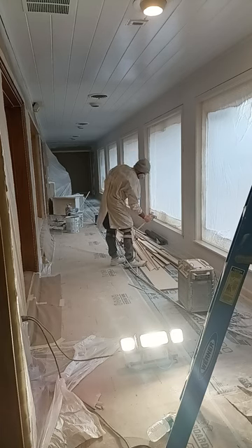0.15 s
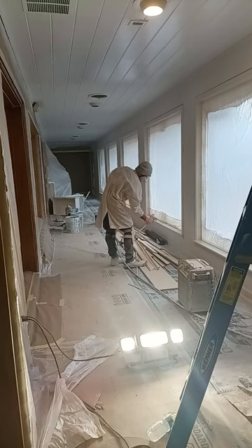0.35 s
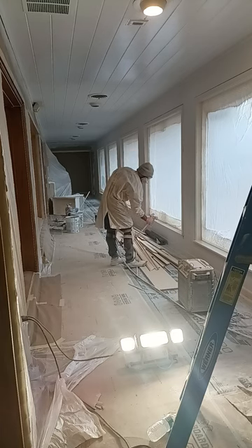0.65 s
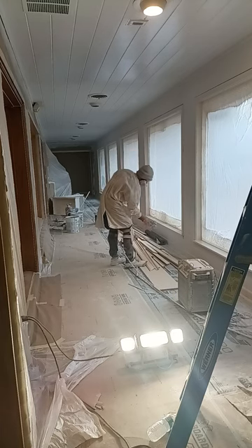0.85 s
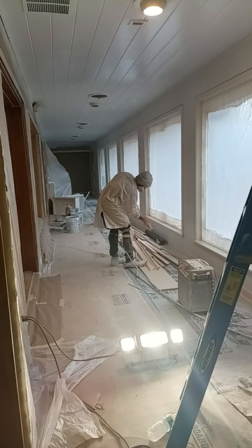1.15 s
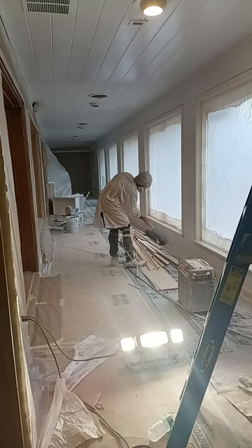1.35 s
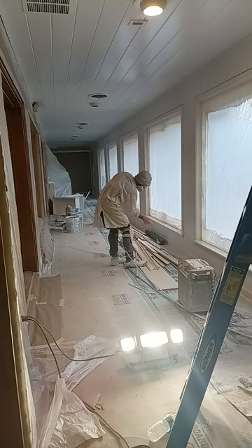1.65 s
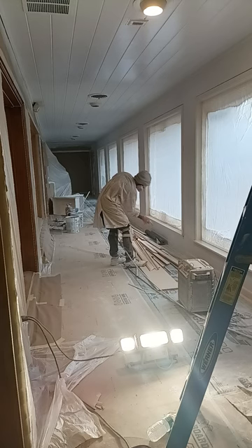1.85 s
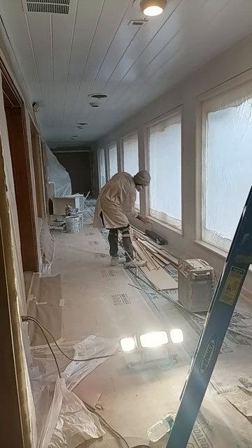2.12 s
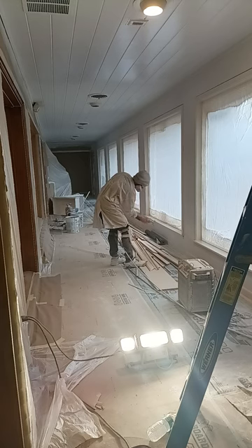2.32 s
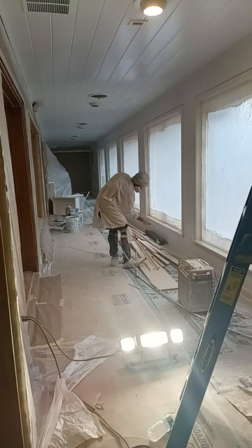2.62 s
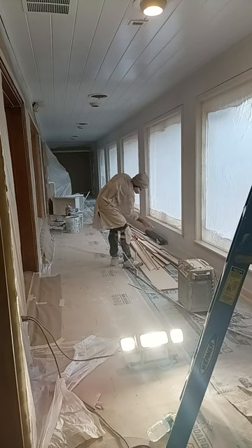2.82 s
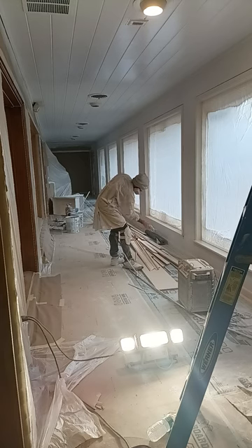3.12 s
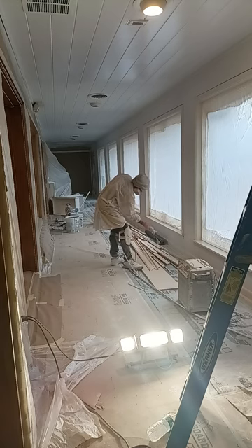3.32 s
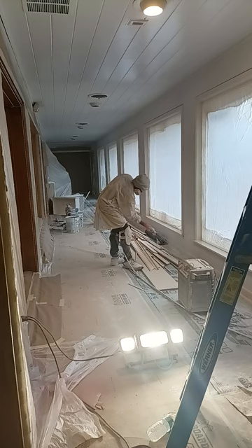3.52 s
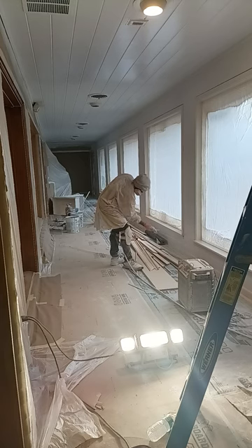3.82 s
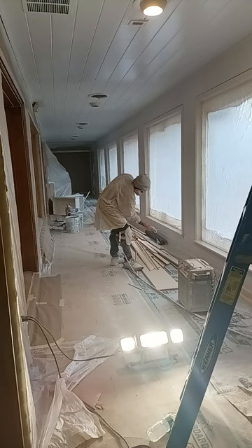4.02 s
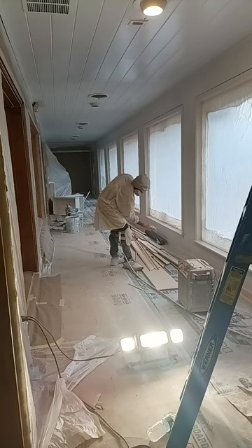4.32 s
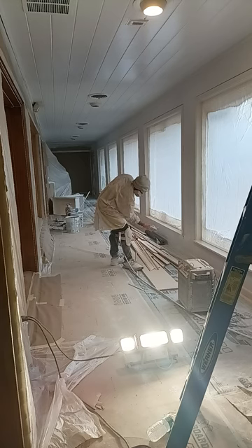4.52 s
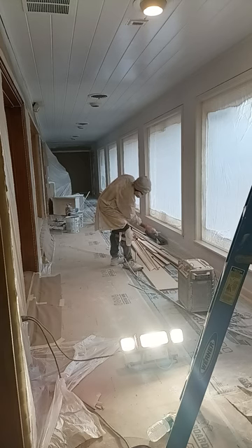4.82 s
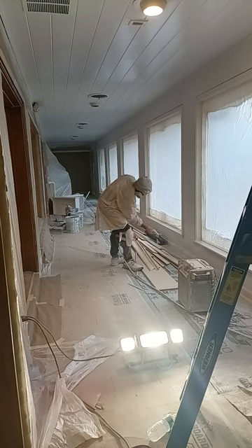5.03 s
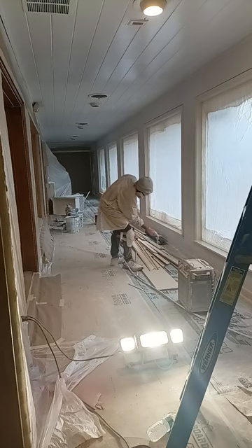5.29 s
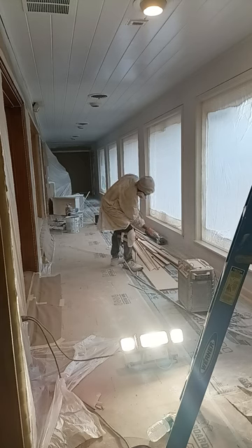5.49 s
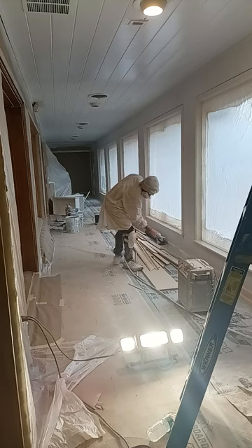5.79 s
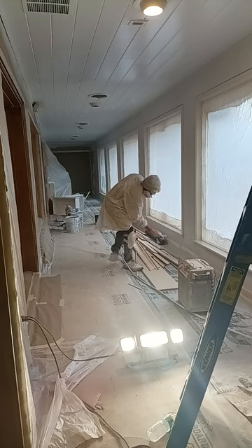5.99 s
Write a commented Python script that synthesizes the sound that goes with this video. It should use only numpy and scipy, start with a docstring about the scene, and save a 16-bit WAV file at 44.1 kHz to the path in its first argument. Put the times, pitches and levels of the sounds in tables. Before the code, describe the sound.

Indoors in a long bare room, an airless spray gun is already hissing. Bright, dense jets open and cut off abruptly, pass after pass. About once a second an electric pump motor growls up, a metallic valve slaps, and the motor coasts down. Little clicks and spits fall in the gaps over low rumble and hum. Wide stereo pickup, louder on the left.

```python
"""An airless paint sprayer in a long bare room. The gun is already hissing as a first valve slap rings out near the start.
Pass follows pass over the boards: jet, mist and splash are coloured noises, opened and shut by the trigger. About once
a second the pump motor spins up in layers of noise and short casing tones, a valve slaps, and the motor coasts down.
Small knocks and spits fall between over a low rumble and hum; a faint thin whine comes near the end.
Two microphone ports facing different ways hear it, the left one louder in most bands."""
import sys
import numpy as np
from scipy import signal
from scipy.fft import rfft, irfft, next_fast_len
from scipy.io import wavfile
from scipy.ndimage import uniform_filter1d, map_coordinates

SR = 44100
rng = np.random.default_rng(int(sys.argv[2]) if len(sys.argv) > 2 else 0)


def pcm_store(signal):
    """Save signal as 16-bit PCM."""
    levels = np.round(np.clip(np.atleast_2d(signal), -1, 1) * 32767)
    wavfile.write(sys.argv[1], SR, levels.astype(np.int16).T)


N = 271270  # samples

# pump strokes: slap_s, slap_db (relative), motor_db, extra_treble_db, extra_bass_db,
# slow_start_db (extra level until 0.28 s before the slap), run_down (length, times the usual)
STROKES = [(0.0204, -15.5, 0.3, 4.5, 1, 0, 0.98), (0.7494, -26, -0.3, 2, 1, -11, 0.91),
           (2.387, -6.5, -0.1, 3.5, -1, -1, 1.044), (3.481, -13, 0.33, 2.6, -0.7, 4.5, 0.96),
           (4.5201, -13.5, -0.24, 4, 5.5, -6.5, 0.99), (5.5069, -11, -0.24, 4.1, -3.5, 1.5, 1.002)]
# colour of the jet, and of the pump's top hiss: pitch_hz, level_db (relative)
JET_COLOUR = [(4000, -45), (4800, -19), (5150, -14), (5500, -13.5), (6050, -5), (6450, -4.5), (6800, -1),
              (7150, 1), (7600, -4), (8100, -10.5), (9500, -23), (11000, -39)]
# colour of the mist, and of the pump's finest hiss: pitch_hz, level_db (relative)
MIST_COLOUR = [(7000, -1), (9000, -0.9), (11000, -8), (13000, -10.5), (16000, -12.5)]


def gun():
    """Paint tears into a jet at the tip, a fine mist above it and a duller splash where it lands."""
    # trigger pulls: opens_s, shuts_s, build_up_s, jet_db, mist_db (against the jet),
    # first_splash_db and last_splash_db (against the jet, as it opens and as it shuts)
    passes = [(-.1, 0.675, .03, -42, -12, -1, -17), (1.17, 1.306, .08, -64, -0.5, 3, -2),
              (1.355, 1.456, .005, -50.5, -26, -8, -2), (1.451, 2.31, .06, -41.5, -10.5, -7, -17),
              (2.605, 3.318, 0.037, -41, -11, 1, -15), (3.617, 4.452, .025, -41.5, -10.5, -20.5, -9.5),
              (4.642, 5.524, 0.023, -42, -10, -19, -9), (5.746, 6.3, 0.049, -41, -10.5, -3.5, -10)]
    # colour of the splash: pitch_hz, level_db (relative)
    splash_colour = [(250, -35.5), (500, -25), (1000, -22), (2000, -12), (3000, -8), (4000, -3.5),
                     (5000, 0.5), (6000, -3)]
    fade_db_per_s = 165  # the hiss dies away after the trigger shuts
    t = np.arange(N) / SR
    jet_gain, mist_gain, splash_gain = np.zeros((3, N))
    for opens, shuts, build, jet_db, mist_db, first_db, last_db in passes:
        opening = np.minimum(np.maximum(t - opens, 0) / build, 1)
        since_shut = np.maximum(np.maximum(t, opens) - shuts, 0)
        flow = opening * amp(jet_db - fade_db_per_s * since_shut)
        jet_gain += flow
        mist_gain += flow * amp(mist_db)
        splash_gain += flow * amp(np.interp(t, [opens, shuts], [first_db, last_db]))
    jet = jet_gain * rush(JET_COLOUR, patchy_db=0.5, grain_db=0.2, grain_rate=450)
    mist = mist_gain * rush(MIST_COLOUR, patchy_db=1.0, grain_db=0.3, grain_rate=490)
    splash = splash_gain * rush(splash_colour, patchy_db=1.8, grain_db=1.0, grain_rate=270)
    splash = amp(2.1 * wobble(6)) * splash
    return amp(0.91 * wobble(25)) * (jet + mist + splash)


def pump():
    """Six colours of noise follow the motor speed, with the casing's tones under the rumble's level."""
    # colours of the casing rumble, gear rattle, brush hiss and frame thrum: pitch_hz, level_db (relative)
    rumble_colour = [(350, -43), (470, -12.5), (560, -2.5), (690, -2.5), (780, -4), (860, -2.5),
                     (1000, -7.5), (1150, -10), (1400, -13)]
    rattle_colour = [(900, -17), (1250, -6.5), (1600, 1.5), (1900, -2.5), (2150, -8.5), (2400, -6.5),
                     (3000, -11), (3500, -16.5), (4000, -21.5), (4600, -45)]
    brush_colour = [(3200, -11.5), (3750, 2), (4100, -2), (4800, 6.5), (5300, 6), (5800, -1), (6500, 3),
                    (7100, -5), (8000, -79), (10000, -49.5)]
    thrum_colour = [(90, -32.5), (170, -14.5), (220, -5), (290, 1.4), (390, 2.5), (450, 1), (560, -34.5)]
    rumble, rattle, brush, thrum, top, fine = strokes()[:6]
    noise = rush(rumble_colour, patchy_db=1.5, grain_db=-0.8, grain_rate=150)
    out = rumble * (noise + casing_tones())
    out += rattle * rush(rattle_colour, patchy_db=1.5, grain_db=1.16, grain_rate=200)
    out += brush * rush(brush_colour, patchy_db=1.5, grain_db=0.5, grain_rate=320)
    out += thrum * rush(thrum_colour, patchy_db=3.5, grain_db=1.2, grain_rate=72)
    out += top * rush(JET_COLOUR, patchy_db=3.5, grain_db=1.7, grain_rate=150)
    out += fine * rush(MIST_COLOUR, patchy_db=1.3, grain_db=-5.2, grain_rate=400)
    return amp(0.37 * wobble(22.22)) * out


def casing_tones():
    """A gear tone crosses each casing mode: a sine at the mode's pitch swells and fades."""
    # casing modes: pitch_hz, level_db (relative), after_slap_s, length_s (spread of the bell-shaped swell)
    modes = [(292.2, -0.5, -0.087, 0.013), (710, 0.5, -0.059, 0.071), (1447, -2, -0.138, 0.016),
             (1525, 4, -.02, 0.02), (697, -0.5, -0.14, 0.09), (300, 1.5, -0.164, 0.014),
             (1729, -0.5, -0.0021, 0.031), (678, 0, 0.056, 0.011), (850, -1, 0.101, 0.021),
             (548, -2.5, 0.14, 0.016), (390, -10, 0.17, 0.053), (2376, -10, 0.022, 0.068),
             (900, -7.5, 0.16, 0.03), (1355, -15, -0.041, 0.021), (1595, -19.5, 0.31, 0.047),
             (1920, -7, -0.089, 0.035), (2297, -10.5, -0.028, 0.078), (3740, -19, 0.04, .05),
             (4740, -20, 0.089, 0.025), (5200, -24, -0.045, 0.05), (5090, -19, 0.1, 0.051),
             (2970, -12.5, -0.069, 0.05), (6390, -16, -0.03, 0.055), (6660, -16.5, 0.032, 0.041)]
    t = np.arange(-SR // 3, SR // 2) / SR  # seconds after the slap
    tones = np.zeros((2, N + 2 * SR))  # a second to spare at both ends
    for slap, *_ in STROKES:
        first = SR + round(slap * SR) - SR // 3
        for hz, db, after, length in modes:
            size, slide, turn = rng.standard_normal((3, 2, 1))  # chance level, pitch and phase per channel
            swell = amp(db + 2.0 + 0.92 * size) * np.exp(-.5 * ((t - after) / length) ** 2)
            cycles = hz * (1 + 0.00394 * slide) * t + turn
            tones[:, first:first + len(t)] += swell * np.sin(2 * np.pi * cycles)
    return tones[:, SR:SR + N]


def strokes():
    """Gain of each pump layer: one shape of motor run-up and run-down laid out at every slap."""
    # one stroke: after_slap_s, then the levels casing_rumble_db, gear_rattle_db, brush_hiss_db,
    # frame_thrum_db, top_hiss_db, finest_hiss_db, floor_boom_db, low_hum_db (all relative)
    shape = [(-.335, -79.5, -74, -85, -80, -90, -95, -73, -85),
             (-.315, -64, -59.5, -68, -60, -85, -93, -83, -79),
             (-.22, -54, -63, -78, -50, -80, -90, -76, -66),
             (-.17, -46.5, -50, -60.5, -44, -75, -84, -75, -66),
             (-.14, -38.5, -40.5, -62, -39, -63, -76.5, -65, -60),
             (-.088, -33, -31, -57.5, -38, -59.5, -70, -63, -55),
             (-.074, -29, -26, -39.5, -34.5, -43, -71.5, -61.5, -59),
             (-.02, -31, -22.5, -34, -33, -43, -65.5, -54, -47),
             (.005, -27, -20.5, -28, -37, -43.5, -56.5, -54, -41.5),
             (.04, -22, -21.5, -30.5, -29.5, -39, -70, -64, -43),
             (0.101, -24.5, -23.5, -36, -30, -45.5, -63.5, -69, -55),
             (.16, -29.5, -27.5, -41.5, -41.5, -55, -70, -63.5, -51.5),
             (0.271, -32.5, -35, -53, -40, -60, -78, -76.5, -73),
             (.45, -52, -56, -71.5, -60.5, -61, -80, -83, -81),
             (.62, -64, -65.5, -66, -71, -64, -83, -91, -81),
             (1.1, -83.5, -82, -89, -96, -80, -93, -93, -87.5)]
    s, *layers = np.transpose(shape)
    gains = np.zeros((len(layers), N))
    for slap, _, motor_db, treble_db, bass_db, start_db, run_down in STROKES:
        t = np.arange(N) / SR - slap
        t = np.where(t > 0, t / run_down, t)
        # the slow start's extra level stops at once 0.28 s before the slap
        level_db = motor_db + np.where(t < -0.28, start_db, 0)
        extra_db = [0, 0, treble_db, 0, treble_db, treble_db, bass_db, bass_db]
        for gain, layer_db, extra in zip(gains, layers, extra_db):
            gain += amp(np.interp(t, s, layer_db, left=-120, right=-120) + level_db + extra)
    return gains


def valve():
    """A valve slaps at the top of each stroke: the modes of its seat ring high and short."""
    # modes of the valve seat: pitch_hz
    seat_hz = (4500, 4790, 5095)
    out, t = np.zeros(N + SR), np.arange(SR // 8) / SR
    attack = 1 - np.exp(-t / 0.00059)
    for slap, db, *_ in STROKES:
        ring = 0
        for hz in seat_hz:
            ring = ring + amp(rng.normal(0, 1.6) - 60 * t / 0.024) * np.sin(2 * np.pi * hz * t)
        out[round(slap * SR):][:len(t)] += amp(db - 9.0) * attack * ring
    return out[:N]


def knocks():
    """Small knocks of trigger, hose and relay: a dying sine roughened by slow noise."""
    # knocks: start_s, level_db (relative), pitch_hz, t60_s, roughness (0-1)
    hits = [(1.357, -39.5, 2080, 0.048, 0.66), (1.44, -33, 2175, 0.056, 0.5),
            (1.457, -38, 2440, 0.063, 0.53), (1.468, -41.5, 2850, 0.053, 0.64),
            (2.069, -48, 1490, 0.18, 0.5), (2.786, -21.5, 1895, 0.037, 0.47), (2.947, -32, 2330, 0.045, .4),
            (2.99, -33, 2280, 0.032, .3), (3.171, -44, 1560, 0.1, 0.5), (3.184, -41, 1950, 0.1, 0.44),
            (5.188, -55, 1600, .07, .4), (5.202, -39, 1504, 0.1, 0.04), (5.785, -29, 1090, 0.11, .1),
            (5.875, -32.5, 867, 0.09, 0.16), (6.045, -47, 877, 0.13, 0.24)]
    out, t = np.zeros(N + SR), np.arange(SR // 8) / SR
    attack = 1 - np.exp(-t / 0.0042)
    for s, db, hz, t60, share in hits:
        grit = unit(np.convolve(rng.standard_normal(len(t)), np.hanning(60), "same"))
        rough = 1 - share + share * grit
        ring = attack * rough * np.sin(2 * np.pi * hz * t)
        out[round(s * SR):][:len(t)] += amp(db - 60 * t / t60) * ring
    return out[:N]


def spits():
    """The tip spits as the trigger is eased: each spit is a short dying puff of coloured noise."""
    # spits: start_s, level_db (relative)
    times = [(1.238, -45), (1.2634, -49), (1.3638, -33), (1.3868, -40.5), (1.4224, -33), (1.44, -31)]
    # colour of a puff: pitch_hz, level_db (relative)
    puff_colour = [(1, -60), (2500, -37), (4500, 6), (7500, 3.5), (9500, -21), (16000, -36)]
    out, t = np.zeros(N + SR), np.arange(SR // 8) / SR
    for s, db in times:
        out[round(s * SR):][:len(t)] += amp(db - 2.0 - 60 * t / 0.022) * rng.standard_normal(len(t))
    return filtered(out[:N], lambda hz: amp(along(puff_colour, hz)[0]))


def air():
    """The room's low rumble, a noise that rises and falls and is lifted by each pump stroke's floor boom."""
    # level of the rumble between strokes: time_s, level_db (relative)
    room_levels = [(0, -68), (1.4, -65), (1.5, -59.5), (1.8, -65.5), (2.9, -67), (3.13, -58), (3.3, -71),
                   (3.9, -71.5), (4.25, -59), (4.9, -72.5), (5.26, -60), (5.8, -73), (6.15, -64.5)]
    # colour of the rumble: pitch_hz, level_db (relative)
    drone_colour = [(15, -35.5), (30, -22), (50, -16), (90, -0.5), (130, -6), (250, -9.5), (400, -17),
                    (700, -20), (1500, -24), (3000, -40)]
    boom = strokes()[6]
    room_db = np.interp(np.arange(N) / SR, *np.transpose(room_levels))
    gain = (boom + amp(room_db)) * amp(1.5 + 0.63 * wobble(5))
    return gain * rush(drone_colour, patchy_db=3.0, grain_db=-1.0, grain_rate=6)


def low_hum():
    """A wavering sine near 166 Hz that rises with each pump stroke and swells now and then."""
    # swells: peak_s, level_db (relative), length_s (spread of the bell-shaped swell)
    hum_swells = [(1.498, -53, 0.032), (2.87, -46.5, 0.033), (5.267, -48.5, 0.1), (6.12, -60, 0.089)]
    t = np.arange(N) / SR
    gain = amp(-76) + strokes()[7]
    for s, db, length in hum_swells:
        gain += amp(db) * np.exp(-.5 * ((t - s) / length) ** 2)
    tone = np.sin(2 * np.pi * np.cumsum(166 + 2.43 * wobble(9.7)) / SR)
    return gain * amp(-4.5 + 2.1 * wobble(12)) * tone


def thin_whine():
    """A faint thin whine: one sine, unsteady in pitch and level."""
    # the whine: start_s, end_s, pitch_hz (centre), level_db (relative, centre)
    start, end, hz, db = (5.84, 6.12, 4020, -61)
    t = np.arange(N) / SR
    fade = np.clip(np.minimum(t - start, end - t) / .03, 0, 1)
    tone = np.sin(2 * np.pi * np.cumsum(hz + 50 * wobble(40)) / SR)
    return fade * amp(db + 4 * wobble(40)) * tone


def room(x):
    """Direct sound plus two unrelated tails of noise, each frequency dying at its own speed."""
    # decay of the room: pitch_hz, t60_s
    decay = [(200, .6), (2000, 1), (8000, 0.42)]
    hz, t, z = signal.stft(rng.standard_normal((2, SR // 2)), SR, nperseg=256)
    t60 = along(decay, hz)[0][:, None]
    tail = signal.istft(z * amp(-60 * t / t60), SR, nperseg=256)[1]
    tail /= np.linalg.norm(tail[0])
    return x + amp(-6.5) * signal.fftconvolve(x[None], tail, axes=1)[:, :N]


def ports(pair):
    """The right port hears part of what the left hears, turned in phase, and part of its own."""
    # the two ports: pitch_hz, likeness (0-1), right_leads_rad, left_minus_right_db (before the ripples)
    port_pair = [(40.4, 0.7, -0.8, 8.5), (170, 0.97, 0.93, 6.5), (360, 0.97, 1.78, 6), (572, 0.56, 5, -5.5),
                 (674, 0.7, 1.5, 7), (780, 0.8, 1, -1), (1060, 0.54, 2, 12), (1404, 0, -7.5, 0.5),
                 (1540, 0.3, -2.2, 20.5), (1650, 1, 1.5, 6), (2360, 0.25, 2, 8), (2970, 0, -3.5, 5.5),
                 (4000, .15, -1.5, 7.5), (5000, 1, 2, 6), (7000, 0.4, 1, 10.5), (8300, 0, -0.5, 3),
                 (11000, .15, -2.5, -2.5), (13800, .12, 5.5, -8)]

    def mix(hz):
        """Gains from the two source channels to the two ports."""
        alike, lead, balance_db = along(port_pair, hz)
        alike = np.clip(alike, 0, 1)
        right = amp(-balance_db / 2)
        # scaled so that the mean of both ports keeps the source's level
        even = 2 / np.sqrt(right ** 2 + right ** -2 + 2 * alike * np.cos(lead))
        # standing waves between the bare walls leave fine fixed ripples, different at each port
        depth_db = 2.8 * hz / (hz + 1500)
        curves = [map_coordinates(rng.standard_normal(1200), [hz / 22]) for _ in pair]
        ripple = amp(depth_db * np.array(curves))[:, None]
        to_left = [1 / right, 0 * hz]
        to_right = [right * alike * np.exp(1j * lead), right * np.sqrt(1 - alike ** 2)]
        return even * ripple * np.array([to_left, to_right])
    return filtered(pair, mix).sum(axis=1)


def rush(spectrum, patchy_db, grain_db, grain_rate):
    """Two unrelated noises of one colour, rms 1, with patches of random gain and a fast grainy flutter."""
    noise = rng.standard_normal((2, N)) * amp(grain_db * wobble(grain_rate))
    z = signal.stft(noise, nperseg=512)[2]
    field = uniform_filter1d(rng.standard_normal(z.shape[1:]), size=3, axis=0)  # smooth over pitch
    field = uniform_filter1d(field, size=8, axis=1)  # and over time
    pair = signal.istft(z * amp(patchy_db * unit(field)), nperseg=512)[1][:, :N]
    ends = [(0.83, -120)] + list(spectrum) + [(SR / 2, -120)]
    return unit(filtered(pair, lambda hz: amp(along(ends, hz)[0])))


def wobble(rate):
    """A smooth random curve, rate knots a second."""
    knots = rng.standard_normal(int(N * rate / SR) + 4)
    return map_coordinates(knots, [np.arange(N) * rate / SR])


def filtered(x, response):
    """x times a complex response of frequency."""
    m = next_fast_len(N + 8192)
    return irfft(rfft(x, m) * response(np.fft.rfftfreq(m, 1 / SR)), m)[..., :N]


def along(points, hz):
    """The columns of (Hz, value, ..) points read on a log axis."""
    f, *cols = np.transpose(points)
    return [np.interp(np.log(hz + 1), np.log(f + 1), c) for c in cols]


def amp(db):
    """dB to gain."""
    return 10 ** (np.asarray(db) / 20)


def unit(x):
    """Scaled to rms 1."""
    return x / np.sqrt(np.mean(x ** 2) + 1e-20)


def scene():
    """All sources through the two ports; the room's tail follows the slaps, knocks and spits."""
    clicks = room(valve() + knocks() + spits())
    background = air() + low_hum() + thin_whine()
    return ports(gun() + pump() + clicks + background)


def record(dry):
    """The loudest peaks are rounded off, and nothing is kept above the band limit."""
    top_hz = 15800
    rounded = dry / (1 + np.abs(dry / .9) ** 5) ** (1 / 5)
    return filtered(rounded, lambda hz: hz < top_hz)


dry = scene()
out = record(dry)
pcm_store(out)
```